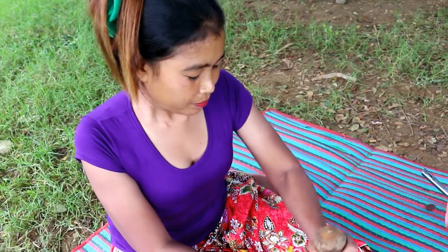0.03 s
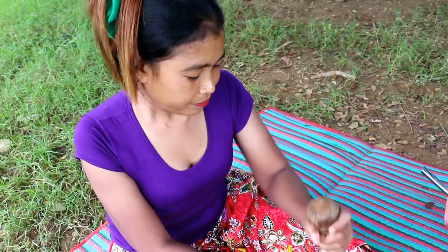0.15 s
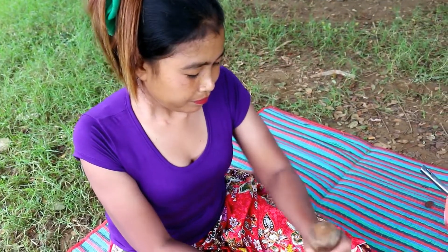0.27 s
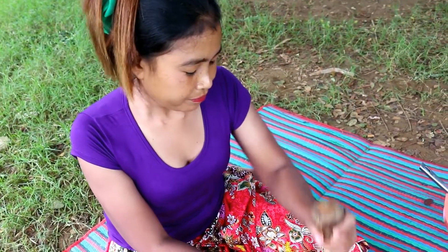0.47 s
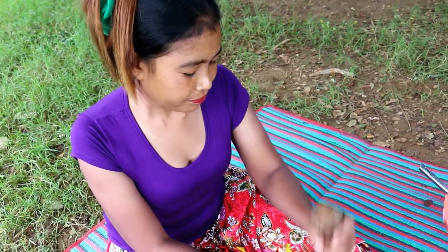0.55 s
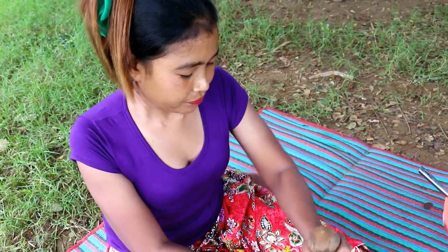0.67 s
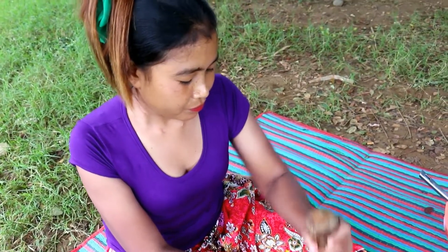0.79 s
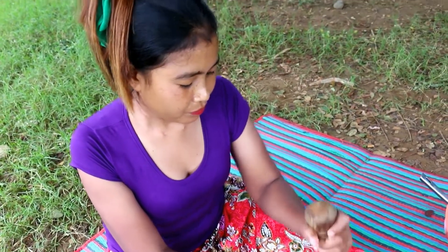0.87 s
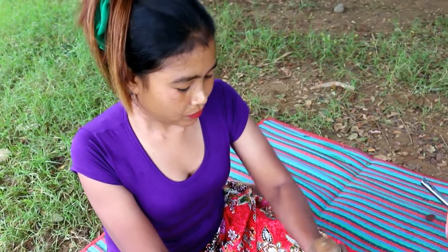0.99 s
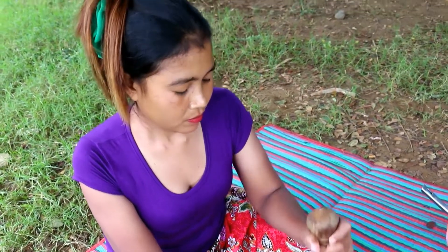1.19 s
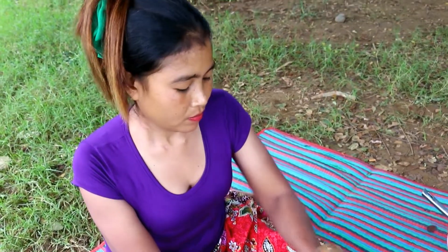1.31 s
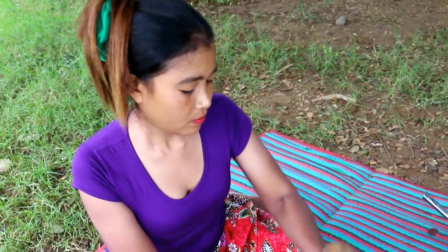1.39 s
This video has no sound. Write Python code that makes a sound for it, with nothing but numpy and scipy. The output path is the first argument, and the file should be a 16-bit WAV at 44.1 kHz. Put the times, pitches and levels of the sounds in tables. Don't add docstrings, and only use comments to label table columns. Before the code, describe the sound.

A wooden pestle strikes a mortar four times at a steady pace, the first a hard hollow knock that overloads the close microphone, the rest cushioned and crunchy, over faint crickets and distant engine hum outdoors.

```python
import sys
import numpy as np
from scipy import signal
from scipy.fft import rfft, irfft
from scipy.io import wavfile
from scipy.ndimage import uniform_filter1d, minimum_filter1d

SR = 44100
rng = np.random.default_rng(int(sys.argv[2]) if len(sys.argv) > 2 else 0)


def field_ratio(decibels):
    return 10 ** (np.asarray(decibels, dtype=float) / 20)


def store_wav(level_fs):
    pcm = np.round(np.clip(np.atleast_2d(level_fs), -1, 1) * 32767)
    wavfile.write(sys.argv[1], SR, pcm.T.astype(np.int16))


N = 63945


def evened(x):
    return x / np.sqrt(np.mean(x ** 2) + 1e-20)


def read(points, hz):
    point_hz, value = np.transpose(points)
    return np.interp(np.log(hz + 1), np.log(point_hz + 1), value)


def add(mix, start_s, sound):
    part = mix[round(start_s * SR):][:len(sound)]
    part += sound[:len(part)]


def resonate(x, hz, width_hz):
    turn = np.exp(2j * np.pi * hz * np.arange(len(x)) / SR)
    decay = np.exp(-np.pi * width_hz / SR)
    return 2 * (turn * signal.lfilter([1 - decay], [1, -decay], x / turn)).real


def coloured(x, gain_db):
    hz = np.fft.rfftfreq(len(x), 1 / SR)
    return irfft(rfft(x) * field_ratio(gain_db(hz)), len(x))


def ports(x, lag_s, pan_db):
    hz = np.fft.rfftfreq(len(x), 1 / SR)
    late = irfft(rfft(x) * np.exp(-2j * np.pi * hz * lag_s), len(x))
    return np.array([late * field_ratio(pan_db / 2), x * field_ratio(-pan_db / 2)])


def bowl():
    # (time [s], force [dB], contact [ms])
    hard_blow = [
        (.2249, -.3, 1.0),
        (.22528, -.3, .15),
    ]
    # (time [s], force [dB], contact [ms])
    soft_blows = [
        (.553, -24, 1.5),
        (.563, -29, 0.83),
        (.569, -32, 1.32),
        (0.899, -23.5, 1.04),
        (.904, -13.5, 2.36),
        (1.236, -34.5, 1),
    ]
    # (frequency [Hz], level [dB],
    # t60 [s], sign)
    modes = [(240, -27, .03, -1), (360, -18.7, .013, -1), (675, -8.8, .02, 1), (770, -4.7, .011, 1),
             (871, -22, .09, 1), (1010, -14.5, .066, -1), (1348, -13.9, .027, -1),
             (1446, -7.8, .013, -1), (2610, -25, .008, -1), (3042, -22.5, .008, 1),
             (139, -34, 0.084, 1), (1940, -52.5, 0.037, -1), (2510, -25, 0.038, 1),
                 (3370, -38, 0.031, -1), (3880, -41, 0.033, 1)]
    touch_s, touch_db, touch_ms = 0.2247, -14, 0.55

    force, touch = np.zeros(N), np.zeros(N)
    for start_s, db, contact_ms in hard_blow + soft_blows:
        phase = np.arange(0, contact_ms / 1000, 1 / SR) / (contact_ms / 1000)
        push = np.sin(np.pi * phase) ** 2 / len(phase) * 2
        add(force, start_s, field_ratio(db) * push)
    phase = np.arange(0, touch_ms / 1000, 1 / SR) / (touch_ms / 1000)
    add(touch, touch_s, -field_ratio(touch_db) * np.sin(np.pi * phase))

    t = np.arange(6000) / SR
    ring = np.zeros(6000)
    for hz, db, t60_s, sign in modes:
        ring += np.sign(sign) * field_ratio(db - 60 * t / t60_s) * np.sin(2 * np.pi * hz * t)
    return touch + signal.oaconvolve(force, ring)[:N]


def snaps():
    # (time [s], peak [dB], pitch [Hz], ring
    # [ms])
    bursts = [(0.2262, -25.5, 7460, 0.79), (0.233, -39, 6800, 2), (.551, -26.5, 4000, 3.5),
              (0.5533, -28.5, 2530, 4.5), (0.552, -25.5, 8450, 1.8), (0.5623, -31, 7600, 2),
              (.565, -35.5, 766, 13), (.8968, -41, 2200, 0.85), (.901, -29, 12500, 1.5),
              (0.9181, -35.5, 4050, 1.2), (1.2408, -28, 4007, 2.6), (1.2402, -36, 8800, 1.7),
              (1.2446, -34, 4100, 2.3), (1.2488, -31, 1510, 2.26),
              (.5524, -18, 4300, .7), (.5526, -25, 8300, .7), (.5622, -16, 3800, .5), (.5623, -22, 7500, .45),
            (.5527, -30, 12500, 2.5), (.8963, -31, 12000, 1.5), (.8961, -28, 4350, 3.5),
            (.9008, -20, 2900, .8), (.9008, -26, 6400, .8), (1.2347, -25, 4300, 1.2),
            (1.2398, -25, 3900, 1.2), (.8965, -33, 14800, 1.2), (.5522, -34, 15000, 2),
            (1.2462, -26, 3600, 1.2), (.26, -27, 630, 22)]
    t, out = np.arange(2000) / SR, np.zeros(N)
    for start_s, db, hz, ring_ms in bursts:
        ragged = evened(resonate(rng.standard_normal(2000), hz, 0.35 * hz))
        tone = np.sin(2 * np.pi * hz * t) + 0.35 * ragged
        rise_s = 0.00015 * ring_ms + 0.00007
        front = np.sin(np.pi / 2 * np.minimum(t / rise_s, 1)) ** 2
        add(out, start_s, field_ratio(db - 20 * t / (ring_ms / 1000)) * front * tone)
    return out


def paste():
    # (time [s], level [dB], rise [ms], t60 [s], brightness [dB/octave])
    squeezes = [
        (0.2265, -29, 1.8, 0.021, -2),
        (0.551, -36, 7.1, 0.15, 1.5),
        (.893, -38, 3.6, 0.13, 4.5),
        (1.229, -39, 10, 0.13, 0.5),
    ]
    # (frequency [Hz], density [dB per Hz])
    spectrum = [(600, -30), (1100, -2), (2000, -4.5), (2600, -0.5), (4200, -6), (7500, -12), (12300, -16),
                (16000, -15)]
    crackles_per_s, crackle_spread_db, wet_share = 2500, 4, 0.31
    length = 8000
    t, out = np.arange(length) / SR, np.zeros(N)
    for start_s, db, rise_ms, t60_s, tilt_db in squeezes:
        size = field_ratio(crackle_spread_db * np.minimum(rng.exponential(1, length), 2.8))
        size = size * (rng.random(length) < crackles_per_s / SR)
        crackle = evened(size * rng.choice([-1., 1.], length))
        mix = wet_share * rng.standard_normal(length) + (1 - wet_share) * crackle
        grit = evened(coloured(mix, lambda f: read(spectrum, f) + tilt_db * np.log2((f + 300) / 5000)))
        rise = np.minimum(t / (rise_ms / 1000), 1)
        add(out, start_s, rise * field_ratio(db - 60 * t / t60_s) * grit)
    return out


def thuds():
    # (time [s], peak [dB], pitch [Hz], length [s])
    swings = [
        (0.223, -32, 45, 0.031),
        (0.572, -42, 50, 0.026),
        (0.891, -33, 85, 0.015),
        (1.143, -50, 55, 0.052),
        (1.236, -41.5, 59.3, 0.043),
    ]
    out = np.zeros(N)
    for start_s, db, hz, length_s in swings:
        t = np.arange(0, length_s, 1 / SR)
        swell = np.sin(np.pi * (t / length_s) ** 0.94) ** 2
        add(out, start_s, field_ratio(db) * swell * np.sin(2 * np.pi * hz * t))
    return out


def crickets():
    # (frequency [Hz], width [Hz], level [dB], chirp rate [1/s])
    singers = [(6420, 150, -67, 6.5), (6650, 45, -64.5, 15.4), (6795, 60, -69, 4.5)]
    gain_db, lag_s, pan_db, scatter = 4.7, 0.000055, -1.1, 0.53
    t, out = np.arange(N) / SR, np.zeros((2, N))
    for hz, width_hz, db, rate in singers:
        beat = np.sin(2 * np.pi * (rate * t + rng.random()))
        slow_beat = np.sin(2 * np.pi * (0.339 * rate * t + rng.random()))
        chirp = np.clip(0.6 + beat + 0.69 * slow_beat, 0.15, 1)
        noises = rng.standard_normal((3, N))
        near, left, right = (evened(resonate(resonate(n, hz, width_hz), hz, width_hz)) for n in noises)
        whistle = ports(near, lag_s, pan_db) + scatter * np.array([left, right])
        out += field_ratio(db + gain_db) * chirp * whistle
    return out


def air():
    # (frequency [Hz], density [dB per Hz])
    spectrum = [(20, -35), (80, 1), (330, -6), (1180, -6), (2400, -11), (3400, -13.5), (9000, -25),
                (15500, -39)]
    # (frequency [Hz], width [Hz], level [dB])
    humps = [(64, 27, -59.5), (94, 28, -58.5), (122.6, 50, -57.5), (403, 372, -52.5), (1240, 950, -57),
             (2015, 770, -56.5)]
    # (frequency [Hz], left-right likeness [-1..1])
    likeness = [(60, 0.99), (300, 0.98), (700, 0.87), (1500, 0.65), (3000, 0.65), (7000, 0.19),
                (15000, 0.155)]
    air_db, patch_db, left_lag_s = -41 - 2.5, 1.8, 0.00011
    frames, hz = N // 256 + 5, np.fft.rfftfreq(1024, 1 / SR)
    a, b, c, d, patches = rng.standard_normal((frames, 513, 5)).T
    patches = uniform_filter1d(patches, size=10, axis=0)
    patches = evened(uniform_filter1d(patches, size=8, axis=1))

    same = np.clip(read(likeness, hz), -1, 1)[:, None]
    right = a + 1j * b
    left = same * right + np.sqrt(1 - same ** 2) * (c + 1j * d)
    left = left * np.exp(-2j * np.pi * hz * left_lag_s)[:, None]
    spectra = np.array([left, right]) * field_ratio(patch_db * patches)
    raw = evened(signal.istft(spectra, nperseg=1024, noverlap=768)[1][:, :N])

    out = field_ratio(air_db) * evened(np.array([coloured(v, lambda f: read(spectrum, f)) for v in raw]))
    for hump_hz, width_hz, db in humps:
        hum = [resonate(resonate(v, hump_hz, width_hz), hump_hz, width_hz) for v in raw]
        out = out + field_ratio(db) * evened(np.array(hum))
    return out


def scene():
    wood = ports(bowl() + thuds(), -0.000048, 1)
    crush = snaps() + paste()
    rim_echo = np.roll(ports(crush, 0.000091, -1.7) * field_ratio(-15.5), 40, axis=1)
    far_side = ports(paste(), -0.00008, 1.9) * field_ratio(-5.5)
    food = ports(crush, -0.00002, 0.4) + far_side + rim_echo
    return wood + food + air() + crickets()


def band_limit(x):
    return signal.sosfilt(signal.butter(12, 16500, fs=SR, output="sos"), x)


def record(dry):
    # (frequency [Hz], left minus right [dB])
    port_tilt = [(60, 0), (150, 1.0), (380, 2.5), (950, 0.5), (2380, -1.5), (5980, -2.5), (15000, 1)]
    # (frequency [Hz], gain [dB])
    mic_edge = [(14000, 0), (15600, -2), (16300, -12), (17000, -70)]
    knee_db, duck_share, hold_s, recover_db_per_s = -28, 0.35, 0.0127, 114
    ceiling = 0.96

    heard = np.array([coloured(v, lambda f: side * read(port_tilt, f) / 2) for v, side in zip(dry, (1, -1))])
    power = abs(uniform_filter1d((heard ** 2).mean(0), size=90))
    power_db = 10 * np.log10(power + 1e-12)
    hold = round(hold_s * SR)
    held_db = -minimum_filter1d(-power_db, hold, origin=(hold - 1) // 2)
    fall_db = np.arange(N) * recover_db_per_s / SR
    cut_db = np.maximum.accumulate(duck_share * (held_db - knee_db) + fall_db) - fall_db
    cut_db = np.maximum(cut_db, 0)
    late_cut_db = np.roll(uniform_filter1d(cut_db, size=700), 450)
    clipped = np.clip(heard / field_ratio(late_cut_db), -ceiling, ceiling)
    finished = np.array([coloured(v, lambda f: read(mic_edge, f)) for v in clipped])
    return band_limit(finished)


dry = scene()
out = record(dry)
store_wav(out)
```